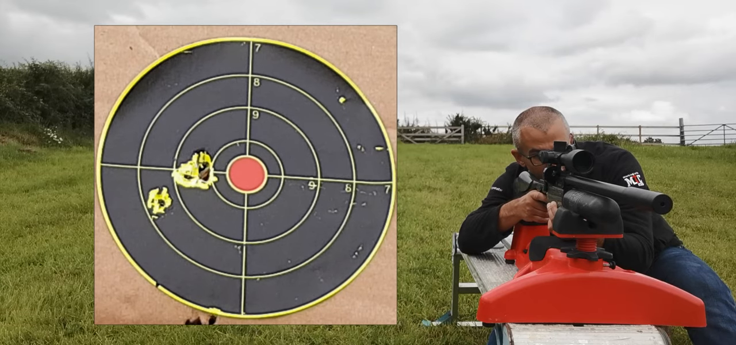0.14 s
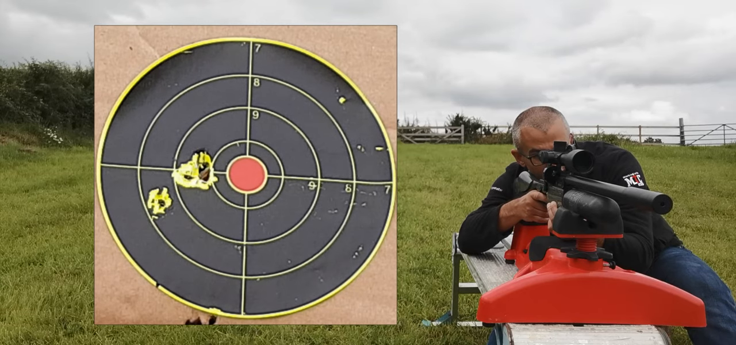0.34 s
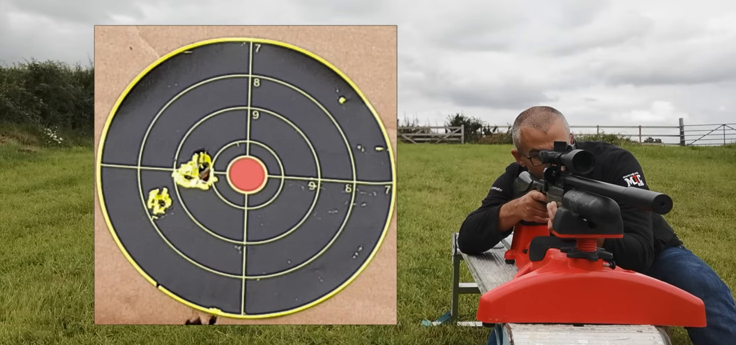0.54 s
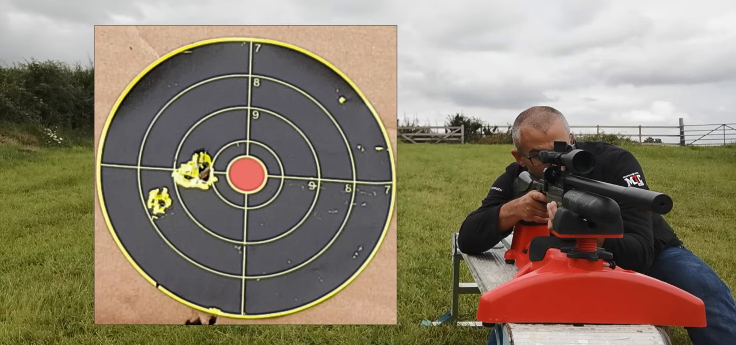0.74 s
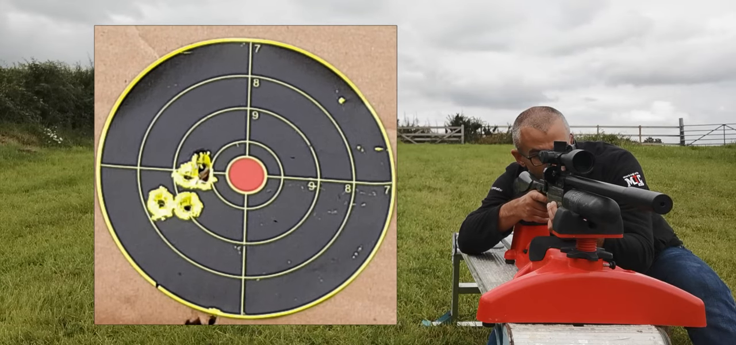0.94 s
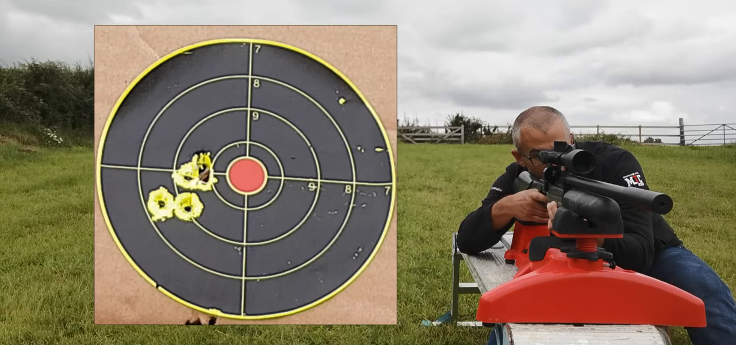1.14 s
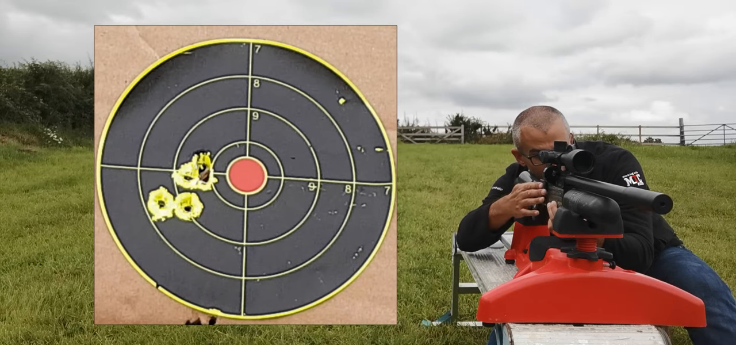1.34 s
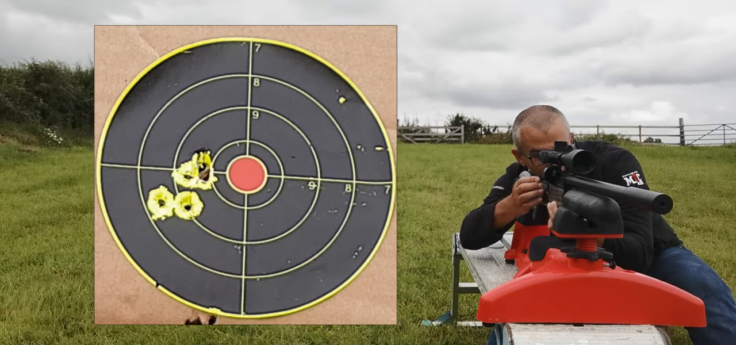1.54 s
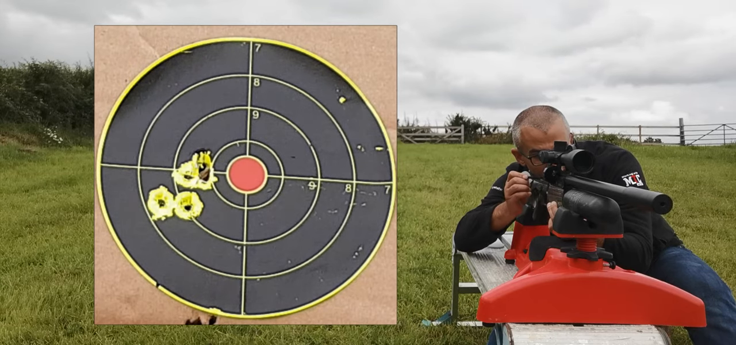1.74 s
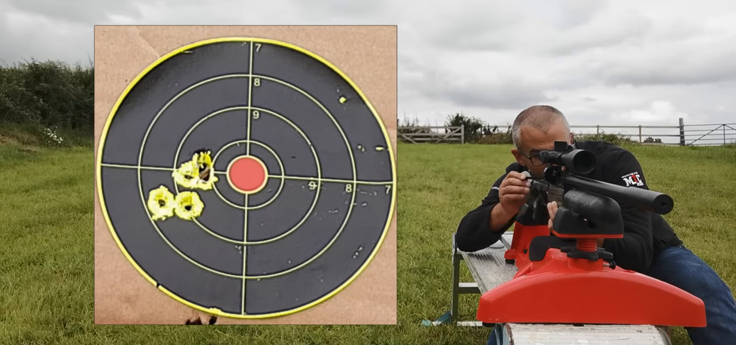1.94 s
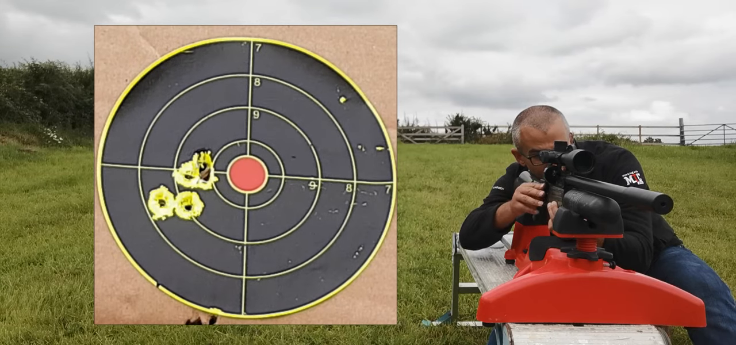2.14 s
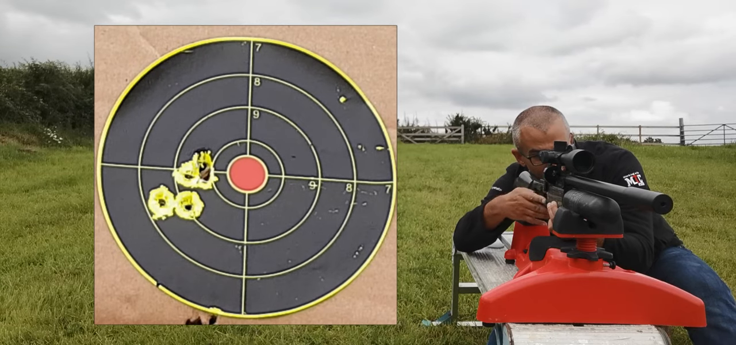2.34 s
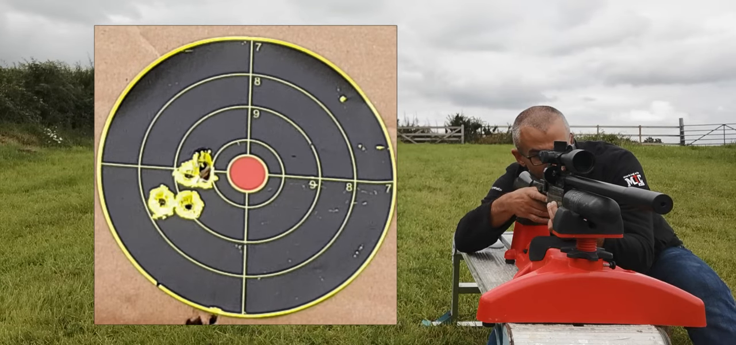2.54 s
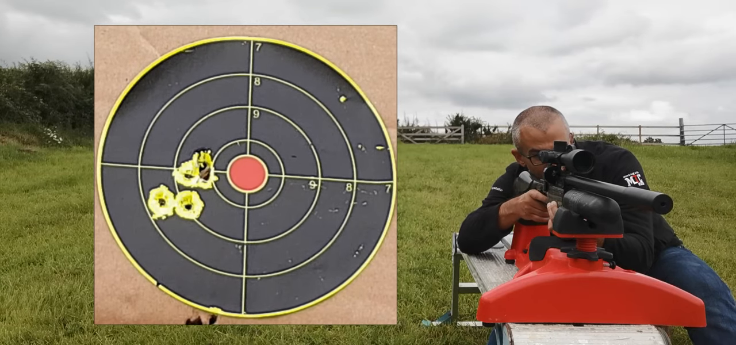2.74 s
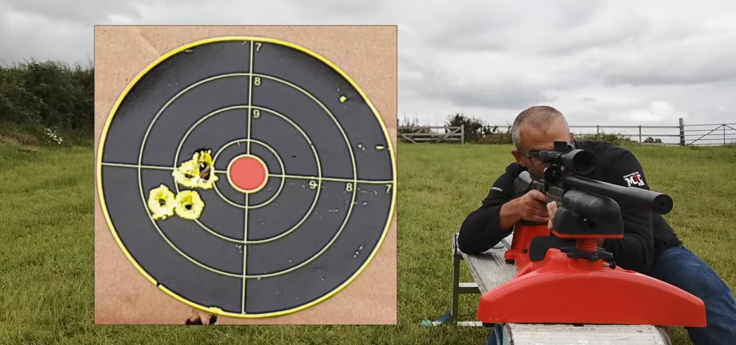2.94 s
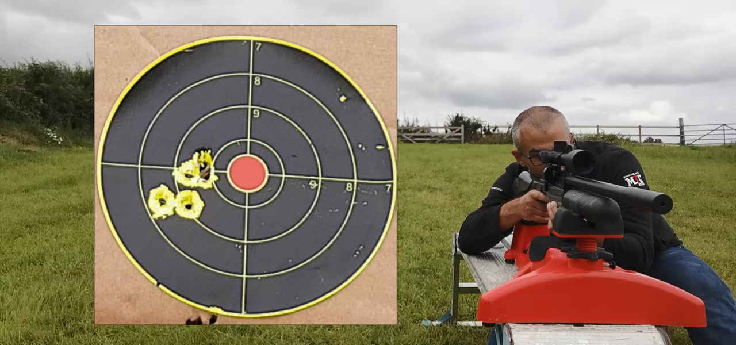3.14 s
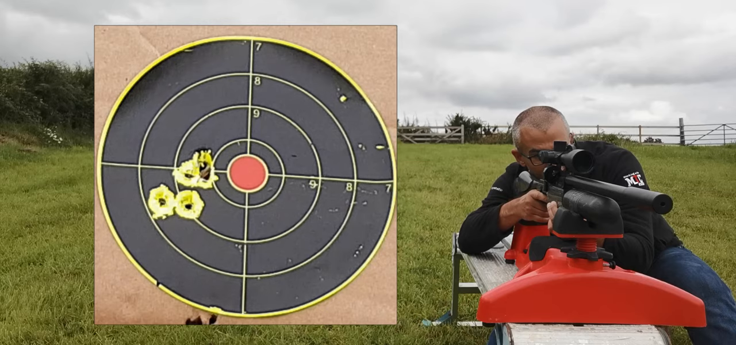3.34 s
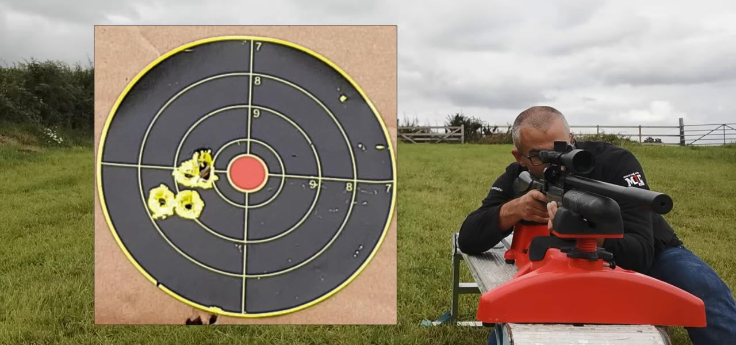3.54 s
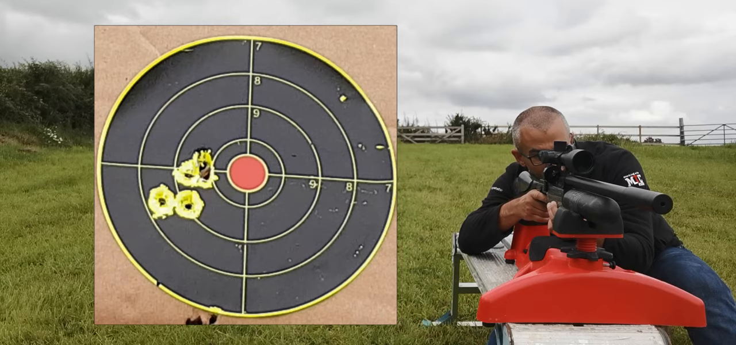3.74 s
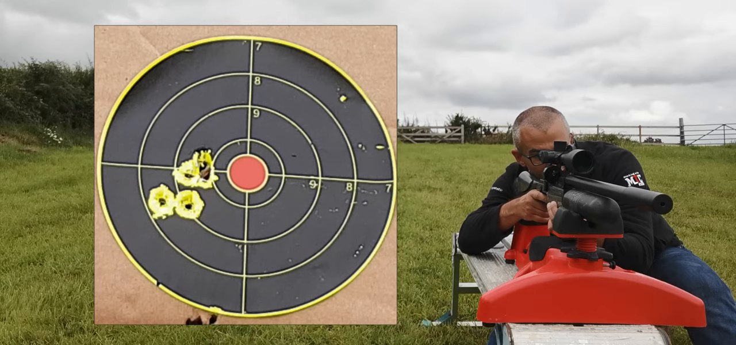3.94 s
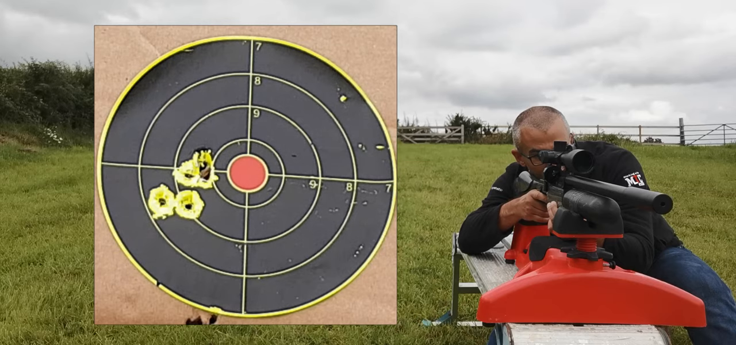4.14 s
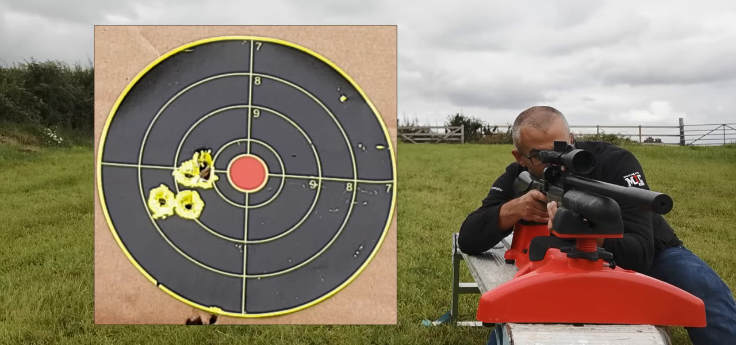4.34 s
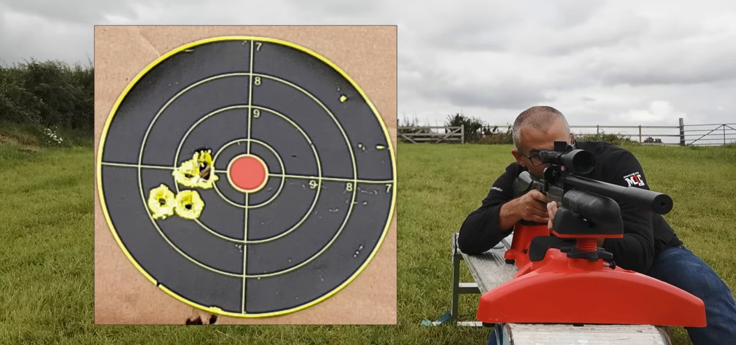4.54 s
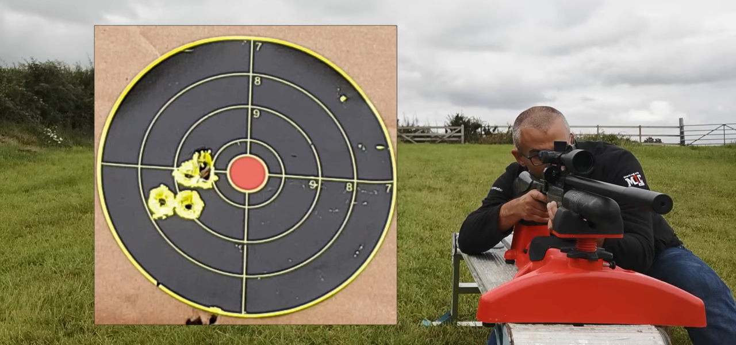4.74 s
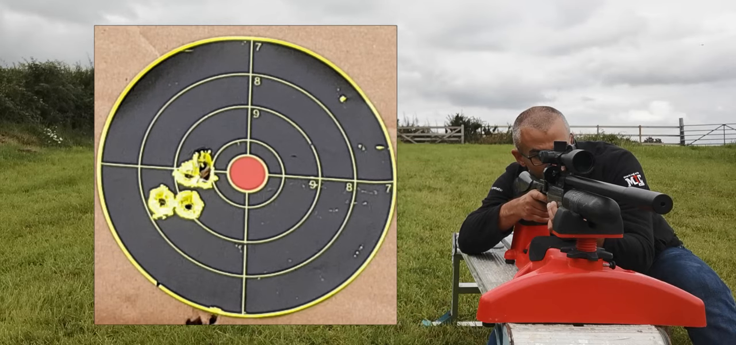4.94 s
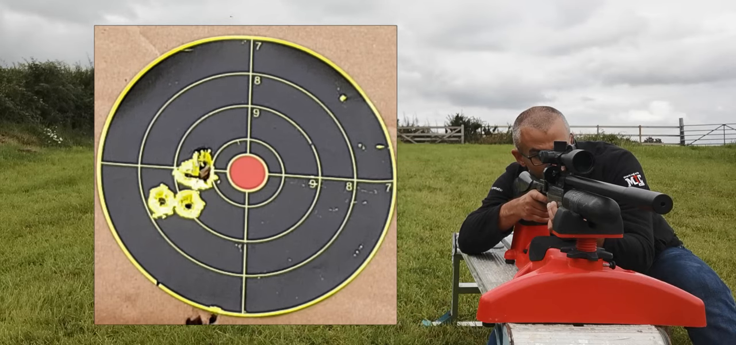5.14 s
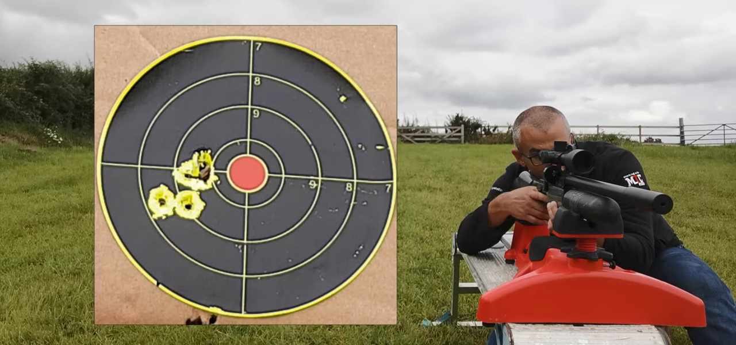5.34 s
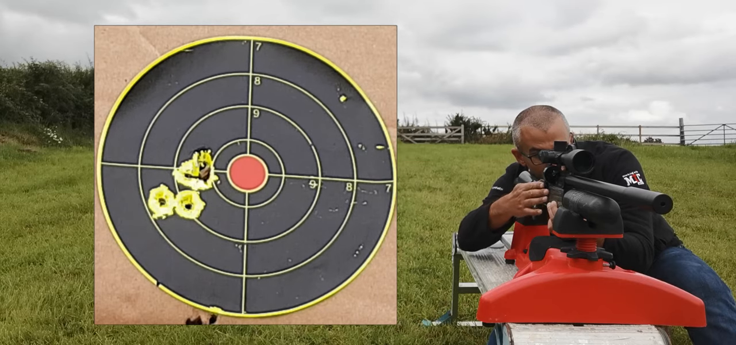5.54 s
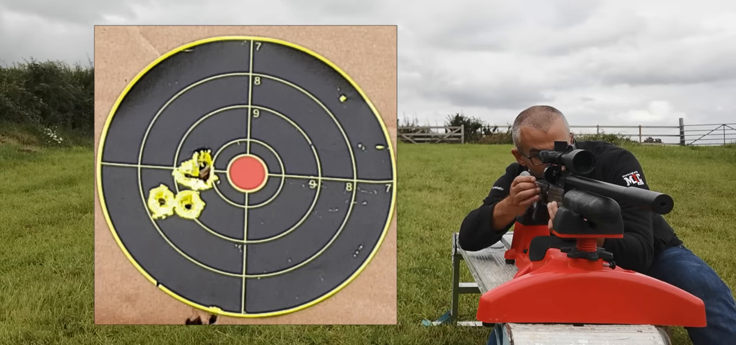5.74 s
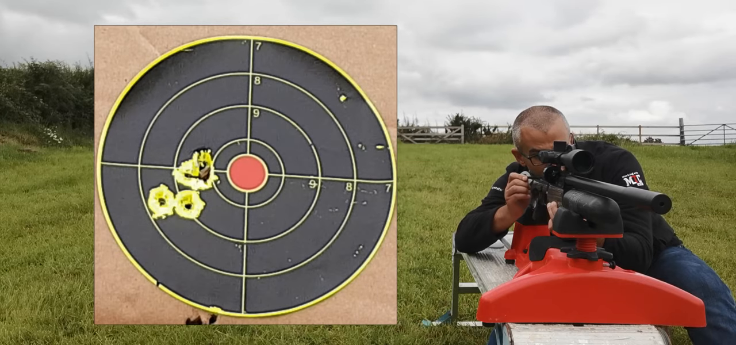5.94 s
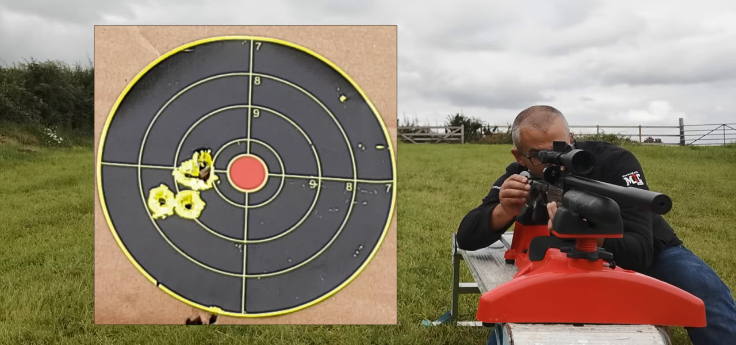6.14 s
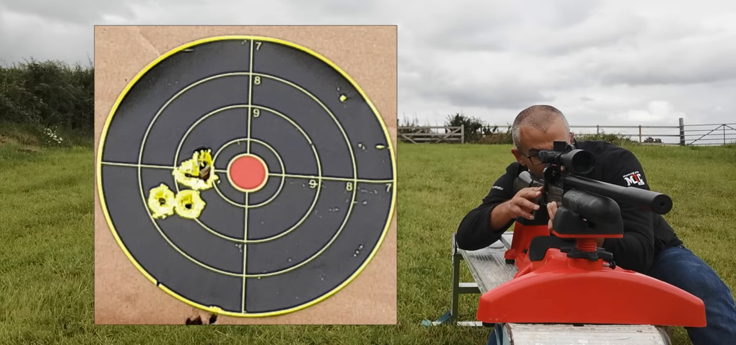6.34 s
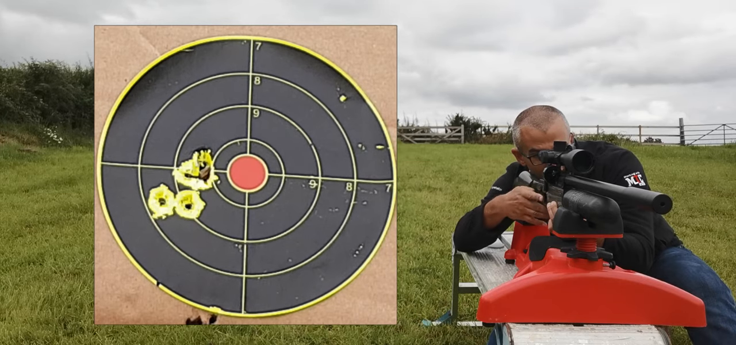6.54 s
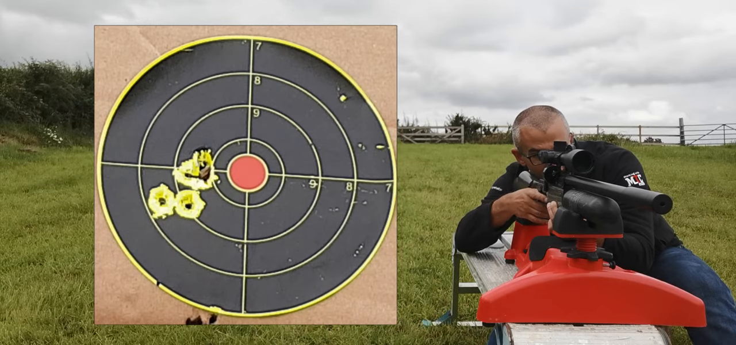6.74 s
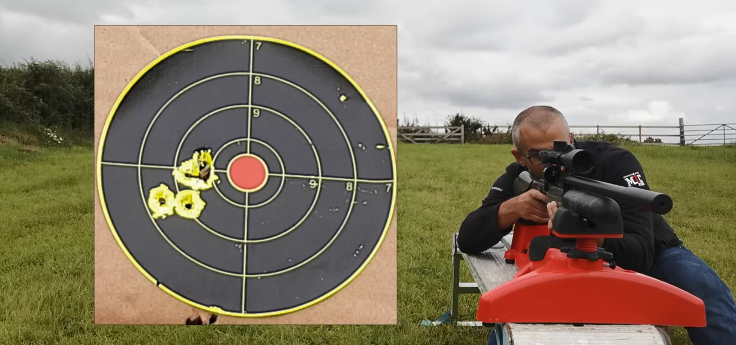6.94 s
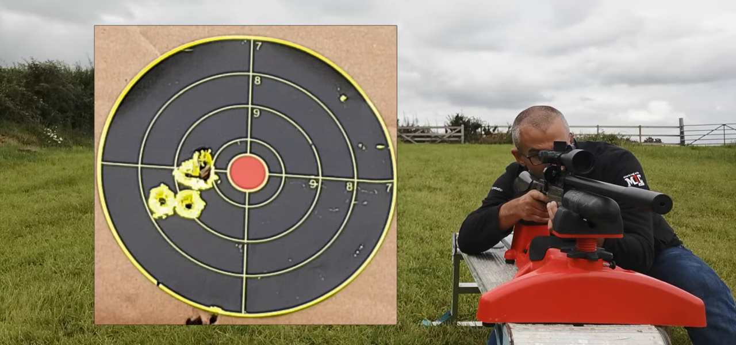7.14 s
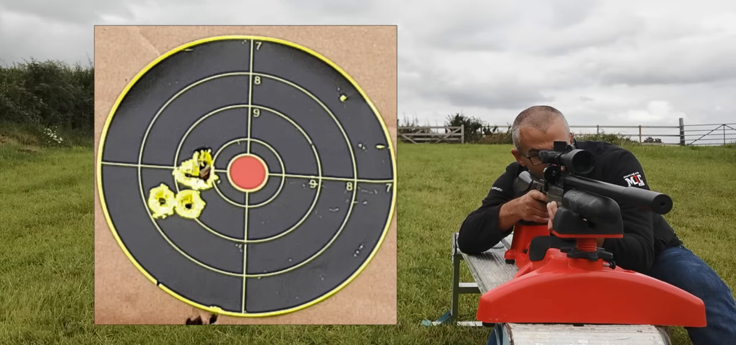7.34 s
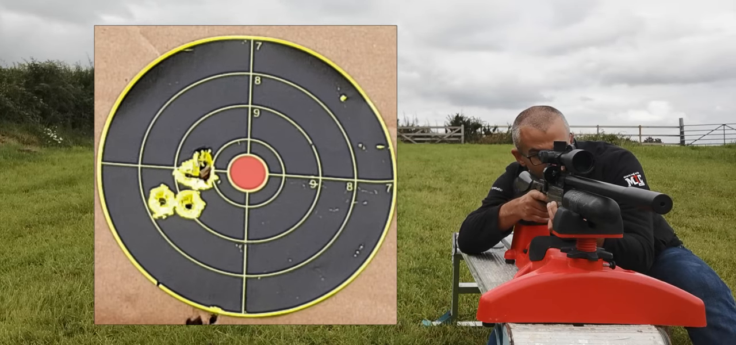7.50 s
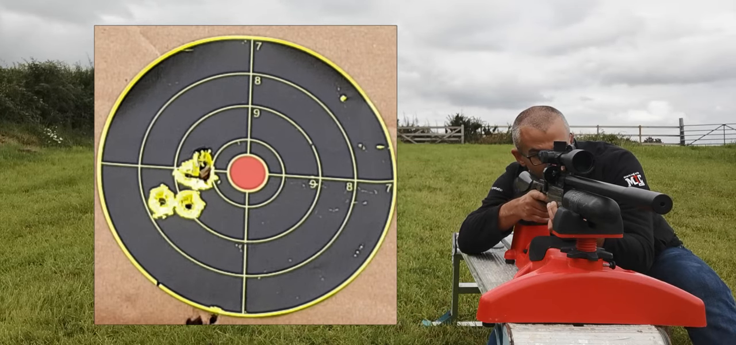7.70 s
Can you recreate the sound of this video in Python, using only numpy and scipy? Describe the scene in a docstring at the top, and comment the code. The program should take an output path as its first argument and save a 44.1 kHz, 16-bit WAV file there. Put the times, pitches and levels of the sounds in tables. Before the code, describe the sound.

An air rifle snaps twice in a windy field, each shot followed by a loud metallic pellet bang and small bolt clicks.

```python
"""An air rifle is fired twice from a bench in a windy field: noise blasts with a ringing air tube, then bolt clicks.
The pellet hisses in as two noise bands and bangs in a sheet-metal trap some 37 m away; scraps of lead bounce there.
The trap is dense noise dying band by band plus singing panels. Gusts buffet the ports; a far road roars.
One microphone pair stands by the rifle, one by the trap; both are mixed, so each end is also heard late."""
import sys
import numpy as np
from scipy import signal
from scipy.fft import rfft, irfft, next_fast_len
from scipy.io import wavfile
from scipy.ndimage import uniform_filter1d

SR = 44100
rng = np.random.default_rng(int(sys.argv[2]) if len(sys.argv) > 2 else 0)


def rack_gain(trim_db):
    """Turn a fader trim in dB into the linear factor to multiply a signal by."""
    fader = np.asarray(trim_db, float)
    return 10 ** (fader / 20)


def persist_wave(psi):
    """Save psi, clipped to +-1, as 16-bit WAV."""
    counts = np.round(np.clip(psi, -1, 1) * 32767).astype(np.int16)
    wavfile.write(sys.argv[1], SR, np.atleast_2d(counts).T)


N = 347067

# Levels are relative; the sources and the mix scale them further.
# hammer tick, air blast, rebound of each shot: (time [s], level [dB], burst t60 [s], air-tube ring [dB])
SHOT_BLOWS = [(0.7045, -21, 0.012, -72), (0.7055, -8, 0.022, -59.5), (0.7154, -27, .012, -22),
              (4.8399, -16, .01, -69), (4.8424, -3.5, 0.017, -56.5), (4.8517, -24.5, .012, -22.5)]
# blast spectrum: (frequency [Hz], density [dB])
BLAST_SPECTRUM = [(35, -42), (60, -6), (1510, -2), (2140, -7), (3940, 0), (6280, -1.5), (7940, -1.5),
                  (10300, -21.5), (14900, -13.5), (16000, -28.5)]
# air-tube modes: (frequency [Hz], level [dB], t60 [s])
AIR_TUBE_MODES = [(1421, -9, 0.046), (2767, -10, 0.045), (4151, -8, 0.1), (5480, -14, 0.059),
                  (6864, -2, 0.051), (8226, -9, 0.04), (9507, 0, 0.028), (11000, -31, 0.053),
                  (12530, -16, 0.056), (13960, -15, 0.035)]
# rifle body under each blow: (frequency [Hz], width [Hz], level offset [dB])
BODY_THUMP = (43, 260, 20)

# bolt and magazine clicks: (time [s], level [dB], knock offset from click [dB])
BOLT_CLICKS = [(1.7498, -42.5, -30), (1.778, -53.5, -13), (1.8604, -37.5, -9), (1.8816, -45, -5),
               (2.0199, -36.5, -32), (2.0692, -43.5, -22), (2.1129, -51.5, -1), (2.2406, -27.5, -4),
               (2.2466, -39, -6), (6.0228, -41.5, 5), (6.0484, -50.5, -3), (6.1864, -36.5, -26),
               (6.2286, -45.5, -13), (6.274, -54, -9.5), (6.4164, -28.5, -5.5), (6.4217, -39.5, -3)]
# resonances of the action: (frequency [Hz], width [Hz], level [dB])
ACTION_MODES = [(5750, 1130, 3), (7200, 920, -10), (3680, 3000, -9.5)]
# latch ring: (frequency [Hz], offset from knock [dB], t60 [s])
LATCH_RING = (5200, -20, .15)
CLICK_T60_S, KNOCK_HZ, KNOCK_WIDTH_HZ = 0.022, 1760, 750

# hand and lever catch on the stock, then slide out: (time [s], dull [dB], bright [dB], fade t60 [s])
SLIDE_STROKES = [(1.529, -63.5, -72, 0.53), (1.619, -51.5, -68, .35), (1.846, -71, -55, .05),
                 (1.868, -55, -55, 0.12), (5.765, -63, -71, .2), (6.03, -58, -57, 0.12)]
CATCH_S = 0.0032

# pellet flights: (start [s], arrival [s], low rush [dB], high hiss [dB], rush swell on arrival [dB])
PELLET_FLIGHTS = [(0.764, .843, -52.5, -46.5, 14.5), (4.9, 4.981, -58.5, -50.5, 45)]
PUFF_DB, PUFF_S, SWELL_S = 11.5, 0.03, 0.017
HISS_SHARE = 0.68   # of the rush's puff and swell in dB

# pellets and scraps: (time [s], level [dB], tilt [dB/octave], bass loss [dB/octave], decay stretch [ratio])
TRAP_BLOWS = [(.849, 4, 0.5, 2.06, 1.115), (4.983, 1.5, 1, 0.73, 1.225), (5.272, -50, 4.5, -3, 0.51),
              (5.342, -44.5, 2, 6, 0.34), (5.5085, -26.5, -7.5, 3, 0.78), (5.552, -44, -6, 10, 0.35),
              (5.609, -41.5, 1.5, 4, 0.78), (5.670, -55, 1.5, 10, 0.24), (5.712, -69, 1, 10, 0.26),
              (5.899, -28.5, -3.5, 10, 0.84)]
# trap spectrum: (frequency [Hz], level [dB])
TRAP_SPECTRUM = [(60, -39), (170, -11), (250, -14.5), (340, -3), (560, -2.5), (800, -1.5), (1050, -7),
                 (1400, -3.5), (2800, -6), (5000, -14.5), (9000, -21.5), (13000, -19.5), (16500, -30.5)]
# trap decay before stretch: (frequency [Hz], t60 [s])
TRAP_DECAY = [(150, 0.83), (350, .75), (700, 0.57), (1400, 0.58), (2800, 0.45), (5600, 0.32), (9000, .3),
              (14000, 0.26)]
# left-right likeness of the trap: (frequency [Hz], correlation [-1 to 1])
TRAP_CORRELATION = [(60, 0.17), (130, 0.33), (290, 0.72), (640, 0.56), (1410, -0.36), (3100, -0.08),
                    (6820, 0.05), (15000, -0.05)]
# trap panels: (frequency [Hz], t60 [s], level before second pellet [dB], level from it on [dB])
PANEL_MODES = [(280, 0.7, -44, -52), (349, 2.6, -60, -58), (351, 0.46, -26.5, -36), (394, .5, -36, -42),
               (474, 2.1, -49.5, -59.5), (512, 1.0, -39, -38), (532, .9, -44, -29), (587, 2.8, -66, -55),
               (619, 2.8, -56, -62), (711, 1.0, -36.5, -40), (726, 0.81, -30, -40.5),
               (773, 1.1, -41, -50.5), (766, 0.74, -30.5, -36), (880, .5, -38, -36), (1104, 1.0, -41, -59)]
PELLET_CRACK_DB, SCRAP_CRACK_DB = 1.5, 5   # crack over ring; light scraps crack more

# gusts on the ports: (time [s], flutter [dB], left-right difference [dB])
GUST_CURVE = [(0, -47, -13), (.17, -54, -7), (.36, -47, -7), (.7, -56, -1), (.95, -51, -2),
              (1.56, -66.5, -3), (2.1, -62.5, 6), (2.5, -53.5, 4), (2.75, -60, 0), (3.4, -63, -3.5),
              (3.81, -54, -4), (4.15, -63, 0), (4.47, -48, -12.5), (4.72, -44, -8), (4.82, -66, 0),
              (5.14, -40, -13), (5.24, -43, 10), (5.42, -67, -4), (5.7, -70, -2.5), (6.3, -60.5, -4.5),
              (6.85, -64, 0), (7.26, -49, 5), (7.6, -57, 0.5), (7.87, -48, 4)]
DEEP_DB, DEEP_FOLLOWS, DEEP_WANDER_DB = -62, 0.45, 4.5   # deep rumble follows the flutter loosely
HARD_DB, HARD_FOLLOWS = -76, 1.3   # strong gusts also rattle higher

# far road: (frequency [Hz], density [dB])
ROAD_SPECTRUM = [(71, -29.5), (120, -14), (157, -15), (261, -6), (324, -6.5), (410, -4), (482, -5),
                 (718, -0.5), (1070, -8), (1840, -18), (3520, -29.5), (9000, -45.5), (11700, -74.5),
                 (19800, -120)]
# amplifier hiss: (frequency [Hz], density [dB])
HISS_SPECTRUM = [(2000, -14.5), (5000, -2), (8500, -7.5), (12500, -2.5), (15500, 0.5)]
ROAD_DB, HISS_DB = -56.5, -71.5

TO_TRAP_S, TO_RIFLE_S = 0.0592, 0.159   # lateness of the far end in each pair


def in_time(rows):
    """Columns of a curve at every sample."""
    s, *columns = np.transpose(rows)
    return [np.interp(np.arange(N) / SR, s, c) for c in columns]


def at_hz(points, hz):
    """A table read on a log-frequency axis."""
    return np.interp(np.log(hz), np.log(np.array(points)[:, 0]), np.array(points)[:, 1])


def rms_one(x):
    """Scaled to unit rms."""
    return x / np.sqrt(np.mean(x ** 2) + 1e-20)


def coloured(x, spectrum):
    """Gain per frequency from a spectrum; keeps the rms of white noise."""
    size = next_fast_len(N)
    gain = rack_gain(at_hz(spectrum, np.maximum(np.fft.rfftfreq(size, 1 / SR), 1)))
    return irfft(rfft(x, size) * rms_one(gain), size)[..., :N]


def band(x, low_hz, high_hz):
    """Band-pass."""
    edges_hz = [low_hz, min(high_hz, SR / 2 - 1000)]
    return signal.sosfilt(signal.butter(2, edges_hz, "band", fs=SR, output="sos"), x)


def noise_band(low_hz, high_hz, channels):
    """Unit-rms band noise with steep edges, unrelated per channel."""
    white = rng.standard_normal((channels, N))
    return rms_one(band(band(white, low_hz, high_hz), low_hz, high_hz))


def late(x, seconds):
    """Delayed copy."""
    lag = max(round(seconds * SR), 0)
    return np.concatenate([np.zeros(x.shape[:-1] + (lag,)), x[..., :N - lag]], axis=-1)


def clicks(times_s, db):
    """One impulse per event."""
    out = np.full(N, 1e-18)
    out[(np.asarray(times_s) * SR).astype(int)] += rack_gain(db)
    return out


def ring(x, hz, t60_s):
    """Two-pole mode: a unit click starts a dying sine of height 1."""
    r, w = rack_gain(-60 / (t60_s * SR)), 2 * np.pi * hz / SR
    return signal.lfilter([0, np.sin(w)], [1, -2 * r * np.cos(w), r * r], x)


def resonance(x, hz, width_hz):
    """Two-pole resonance, gain 1 on top."""
    r = np.exp(-np.pi * width_hz / SR)
    feedback = [1, -2 * r * np.cos(2 * np.pi * hz / SR), r * r]
    return signal.lfilter([(1 - r * r) / 2, 0, (r * r - 1) / 2], feedback, x)


def bursts(times_s, db, t60_s):
    """Envelope that jumps at each event and dies with its own t60."""
    t, out = np.arange(N) / SR, np.zeros(N)
    for s, level_db, fade_s in zip(times_s, db, t60_s):
        after = slice(int(s * SR), int((s + 2 * abs(fade_s)) * SR))
        out[after] += rack_gain(level_db - 60 * (t[after] - s) / abs(fade_s))
    return out


def scattered(x, length_s, t60_s):
    """Diffuse echoes: convolution with decaying noise, unrelated per channel."""
    n = int(length_s * SR)
    tail = rng.standard_normal((2, n)) * rack_gain(-60 * np.arange(n) / SR / t60_s)
    return signal.fftconvolve(x, tail, axes=1)[:, :N]


def shots():
    """Blast noise dies in milliseconds; the blows ring the air tube's harmonic row and thump the body."""
    s, level_db, t60_s, tube_db = np.transpose(SHOT_BLOWS)
    white = rng.standard_normal((2, N))
    blast = rack_gain(-1) * coloured(bursts(s, level_db, t60_s) * white, BLAST_SPECTRUM)
    tube = sum(ring(clicks(s, tube_db + db), hz, fade_s) for hz, db, fade_s in AIR_TUBE_MODES)
    thump_hz, thump_width_hz, thump_db = BODY_THUMP
    thump = resonance(clicks(s, level_db + thump_db), thump_hz, thump_width_hz)
    return blast + (tube + thump) * [[1], [0]]


def bolt():
    """Gritty bursts through the resonances of the action, a duller knock, and the latch ringing on."""
    s, level_db, knock_offset_db = np.transpose(BOLT_CLICKS)
    knock_db = level_db + knock_offset_db
    t60_s = np.full(len(s), CLICK_T60_S)
    grit = rng.standard_normal((2, N)) * rack_gain(2.0 * rng.exponential(1, N))
    # parts seat over 1.4 ms
    seat = uniform_filter1d(bursts(s + 0.00081, level_db + 5.5, t60_s), int(0.0014 * SR))
    click = sum(rack_gain(db) * resonance(grit * seat, hz, width_hz) for hz, width_hz, db in ACTION_MODES)
    click = band(band(click, 2500, 8800), 1800, 8700)
    knock = resonance(grit * bursts(s, knock_db + 16.0, t60_s), KNOCK_HZ, KNOCK_WIDTH_HZ)
    knock = band(knock, 1400, 2100)
    latch_hz, latch_db, latch_t60_s = LATCH_RING
    return click + knock + ring(clicks(s, knock_db + latch_db), latch_hz, latch_t60_s)


def slide():
    """Grainy friction in a dull and a bright band; each stroke catches quickly and fades."""
    s, dull_db, bright_db, t60_s = np.transpose(SLIDE_STROKES)
    grain = rack_gain(1.9 * noise_band(40, 430, channels=1))
    catch = max(int(CATCH_S * SR), 1)
    dull = uniform_filter1d(bursts(s + CATCH_S / 2, dull_db, t60_s), catch)
    bright = uniform_filter1d(bursts(s + CATCH_S / 2, bright_db, t60_s), catch)
    friction = dull * noise_band(1400, 3100, channels=2) + bright * noise_band(3600, 7000, channels=2)
    return grain * friction


def flight(t, start_s, arrival_s, rush_db, hiss_db, swell_db):
    """Rush and hiss gains of one flight: an opening puff, a steady part, a swell just before the blow."""
    flying = (t >= start_s) & (t < arrival_s)
    puff_db = PUFF_DB * np.exp(-np.abs(t - start_s) / PUFF_S)
    shape_db = puff_db + swell_db * np.exp(-np.abs(arrival_s - t) / SWELL_S)
    return flying * rack_gain(rush_db + shape_db), flying * rack_gain(hiss_db + HISS_SHARE * shape_db)


def pellet():
    """A low rush and a high hiss of noise, as long as the pellet is in the air."""
    t = np.arange(N) / SR
    rush, hiss = np.sum([flight(t, *row) for row in PELLET_FLIGHTS], axis=0)
    return rush * noise_band(700, 3500, channels=2) + hiss * noise_band(3100, 16000, channels=2)


def trap():
    """Blows crack, then fill the metal box with dense rattling ring dying band by band; panels sing on."""
    s, level_db, tilt, bass_loss, stretch = np.transpose(TRAP_BLOWS)
    crack_db = np.where(level_db > -15, PELLET_CRACK_DB, SCRAP_CRACK_DB)
    crack_t60_s = np.full(len(s), 0.07)
    edges_hz, out = 90 * 2 ** np.arange(0, 7.7, 1 / 2), 0
    rattle = rack_gain(1.5 * noise_band(25, 250, channels=1))   # loose sheet buzzing
    white = rng.standard_normal((2, 2, N)) * rattle   # neighbour bands take unrelated noise
    for k, (low, high) in enumerate(zip(edges_hz, edges_hz[1:])):
        hz = np.sqrt(low * high)
        mid, side = band(band(white[k % 2], low, high), low, high)
        alike = np.clip(at_hz(TRAP_CORRELATION, hz), -1, 1)
        octaves = np.log2(hz / 1400)
        db = level_db + at_hz(TRAP_SPECTRUM, hz) + tilt * max(octaves, 0) + bass_loss * min(octaves, 0)
        lag = np.exp(-hz / 8.3 / SR)   # the box fills with a time constant of 8.3 cycles
        decay = bursts(s, db, stretch * at_hz(TRAP_DECAY, hz))
        fill = signal.lfilter([1 - lag], [1, -lag], decay + 1e-18)
        crack = bursts(s, db + crack_db + 1.9 * min(octaves, 0), crack_t60_s)   # thin in the bass
        stereo = np.sqrt(1 + alike) * mid + np.sqrt(1 - alike) * side * [[1], [-1]]
        out = out + (fill + crack) * stereo
    from_second = s >= s[1]   # scraps fall where the second pellet struck
    panels = 0
    for hz, t60_s, first_db, second_db in PANEL_MODES:
        panel_db = np.where(from_second, second_db, first_db)
        panels = panels + ring(clicks(s, level_db - bass_loss + panel_db), hz, t60_s)
    push = resonance(clicks(s, level_db - 3 * bass_loss), 230, 500)   # the wall jumps away from the blow
    return rack_gain(12.5) * out + rack_gain(19.0) * panels - rack_gain(28) * push


def wind():
    """Lumpy low noise, unrelated in the two ports; the deep rumble wanders on its own."""
    flutter_db, pan_db = in_time(GUST_CURVE)
    swing_db = flutter_db - np.mean(flutter_db)
    lumps = rack_gain(3.5 * noise_band(3, 14, channels=2))
    deep_db = DEEP_DB + DEEP_FOLLOWS * swing_db + DEEP_WANDER_DB * noise_band(1, 4, channels=2)
    hard_db = HARD_DB + HARD_FOLLOWS * swing_db
    deep = rack_gain(deep_db) * np.sqrt(lumps) * noise_band(21, 70, channels=2)
    flutter = rack_gain(flutter_db) * lumps * noise_band(53, 160, channels=2)
    hard = rack_gain(hard_db) * lumps * noise_band(140, 320, channels=2)
    return (deep + flutter + hard) * rack_gain(np.clip(pan_db, -12, 12) / 2 * [[1], [-1]])


def road(level_db, alike):
    """Far tyre roar from the left: the right port hears the shared part later."""
    shared, left, right = coloured(rng.standard_normal((3, N)), ROAD_SPECTRUM)
    alike = np.clip(alike, 0, 1)
    common = np.array([shared, late(shared, 0.00042)])
    return rack_gain(level_db) * (alike * common + np.sqrt(1 - alike ** 2) * np.array([left, right]))


def amplifier_hiss():
    """Steady coloured noise, unrelated per channel."""
    return rack_gain(HISS_DB) * coloured(rng.standard_normal((2, N)), HISS_SPECTRUM)


def from_right(x, lag_s, left_db):
    """A source right of the pair: row 0 is shared, row 1 is what only the shaded left port gets."""
    left = rack_gain(left_db) * late(0.75 * x[0] + 0.66 * x[1], lag_s)
    return np.array([left, x[0]]) * rack_gain(2.5)


def rifle_at_trap(shot, handling):
    """The rifle heard from the trap: weak, late, scattered around the trap."""
    # the blast is aimed at the trap
    muzzle_side = rack_gain(-22) * shot + rack_gain(-25) * band(handling, 1000, 4800)
    far = muzzle_side + rack_gain(-23.5) * scattered(muzzle_side, length_s=0.1, t60_s=0.064)
    return late(far, TO_TRAP_S)


def trap_at_rifle(box):
    """The trap heard from the rifle: late, top cut by distance, echoed off hedge and fence."""
    far = band(band(late(box, TO_RIFLE_S), 3780, 9000), 2330, 8400)
    far = signal.sosfilt(signal.butter(6, 8700, fs=SR, output="sos"), far)
    return rack_gain([[-24], [-21]]) * (far + rack_gain(-36.5) * scattered(far, length_s=0.5, t60_s=0.23))


def turn_down(x, from_db, share, most_db, release_db_s, smooth_s):
    """Gain control: a share of the excess level is taken off; the held level falls at a fixed rate."""
    power = uniform_filter1d(np.mean(x ** 2, axis=0), max(int(smooth_s * SR), 1))
    level_db = 10 * np.log10(power + 1e-14)
    ramp_db = release_db_s * np.arange(N) / SR
    held_db = np.maximum.accumulate(level_db + ramp_db) - ramp_db
    return x * rack_gain(-np.clip(share * (held_db - from_db), 0, most_db))


def scene():
    """Both microphone pairs, each with its own end close and the other far; gain control by the trap."""
    shot, handling, box = shots(), bolt() + slide(), trap()
    hiss = amplifier_hiss()
    by_trap = box + pellet() + rifle_at_trap(shot, handling) + road(ROAD_DB, alike=0.64) + hiss
    by_trap = turn_down(by_trap, from_db=-21.0, share=0.86, most_db=12, release_db_s=28.0, smooth_s=0.0023)
    by_rifle = from_right(shot + handling, lag_s=0.00022, left_db=-8.5) + trap_at_rifle(box)
    by_rifle = by_rifle + road(ROAD_DB - 0.1, alike=0.8)
    by_rifle = by_rifle + rack_gain(-10.5) * hiss[::-1, ::-1]   # swapped and reversed: unrelated hiss
    return by_trap + by_rifle + wind()


def roll_off(x):
    """The treble ends steeply here."""
    return signal.sosfilt(signal.butter(12, 17000, fs=SR, output="sos"), x)


def record(dry):
    """A fast limiter flattens the bangs, peaks are rounded, the top is cut."""
    limited = turn_down(dry, from_db=-6.5, share=0.6, most_db=15, release_db_s=152.5, smooth_s=0.012)
    rounded = np.tanh(limited / 1.098)
    finished = signal.sosfilt(signal.cheby2(12, 70, 16800, fs=SR, output="sos"), rounded)
    return roll_off(finished)


dry = scene()
out = record(dry)
persist_wave(out)
```